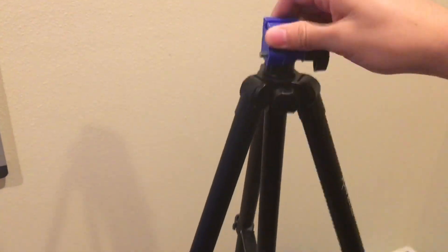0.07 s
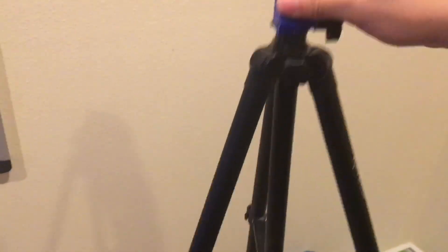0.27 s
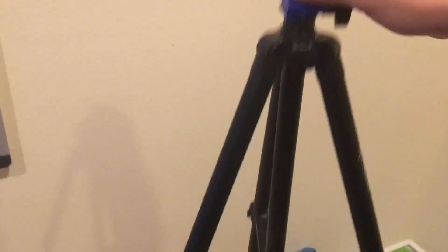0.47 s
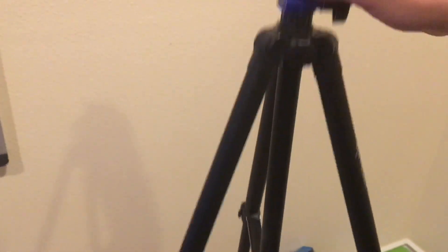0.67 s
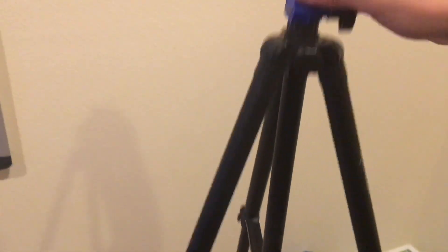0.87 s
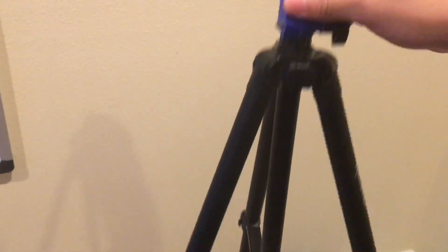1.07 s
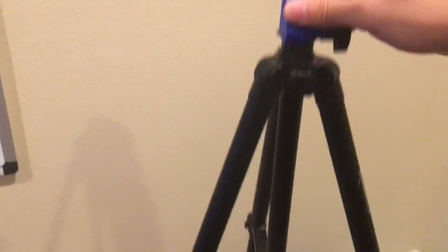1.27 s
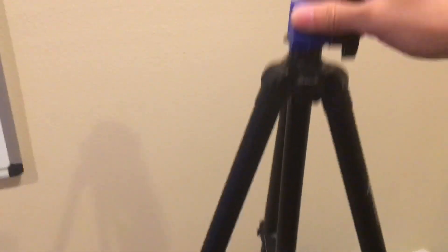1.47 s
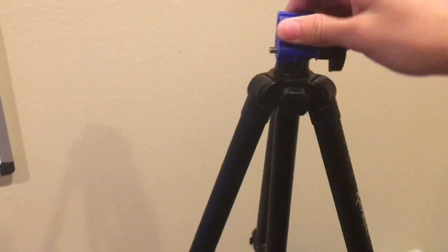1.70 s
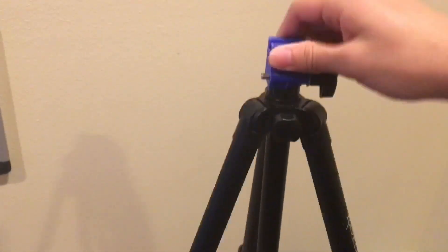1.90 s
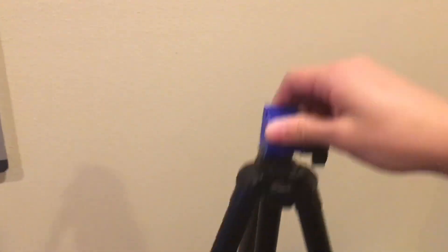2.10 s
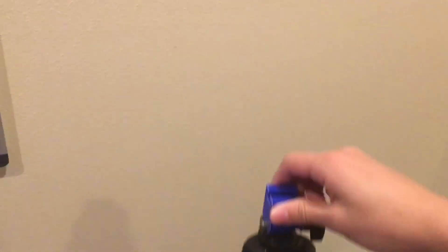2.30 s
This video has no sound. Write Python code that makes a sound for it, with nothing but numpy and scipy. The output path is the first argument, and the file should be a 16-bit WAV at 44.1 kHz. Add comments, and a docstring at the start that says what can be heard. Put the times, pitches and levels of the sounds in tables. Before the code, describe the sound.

Sharp ratchety clacks as a small plastic mount is screwed onto a tripod.

```python
"""Screwing a mount onto a tripod

A small plastic mount is screwed onto a tripod head in quick finger turns, about five a second.
At each turn the loose part ticks, scrapes along the thread by stick-slip friction and clacks against
its seat, often in two or three impacts that excite damped modes of the plastic and the steel screw.
The thread knocks softly between turns. A small room reverberates, and an appliance hums in it."""
import sys
import numpy as np
from scipy import signal
from scipy.fft import rfft, irfft, next_fast_len
from scipy.io import wavfile
from scipy.ndimage import map_coordinates

SR = 44100
rng = np.random.default_rng(int(sys.argv[2]) if len(sys.argv) > 2 else 0)


def digitize_waveform(pressure):
    """Quantize a signal to 16-bit integers and store it at the path in sys.argv[1].

    Rows of a 2-D input are taken as channels; values are limited to [-1, 1].
    """
    field = np.atleast_2d(pressure).T
    bounded = np.clip(field, -1, 1)
    quanta = np.round(bounded * 32767).astype(np.int16)
    wavfile.write(sys.argv[1], SR, quanta)


N = 108045


def amp(db):
    """Amplitude ratio of a level in decibels."""
    return 10 ** (np.asarray(db) / 20)


def unit_rms(x):
    """Normalisation to an rms of 1."""
    return x / np.sqrt(np.mean(x ** 2) + 1e-20)


def curve_at(points, hz):
    """Interpolation of (frequency [Hz], value) points on a logarithmic frequency axis."""
    freqs, values = np.transpose(points)
    return np.interp(np.log(hz + 1), np.log(freqs + 1), values)


def decay(t, t60):
    """Exponential damping: 60 dB in t60 seconds."""
    return np.exp(-np.log(1000) * t / t60)


def filtered(x, gain_db):
    """Minimum-phase filtering by the folded cepstrum; gain_db is a function of frequency."""
    size = 2 * next_fast_len(len(x))
    cepstrum = irfft(np.log(amp(gain_db(np.fft.rfftfreq(size, 1 / SR)))), size)
    cepstrum[1:size // 2] *= 2
    cepstrum[size // 2 + 1:] = 0
    return irfft(rfft(x, size) * np.exp(rfft(cepstrum)), size)[:len(x)]


def wobble(rate_hz):
    """Smooth random modulation: a spline through rate_hz Gaussian values a second."""
    knots = rng.standard_normal(int(N * rate_hz / SR) + 4)
    return map_coordinates(knots, [np.arange(N) * rate_hz / SR])


def add(track, start_s, x):
    """Superposition of x onto the track from start_s on."""
    part = track[..., round(start_s * SR):][..., :x.shape[-1]]
    part += x[..., :part.shape[-1]]


# Partials of the appliance hum: (frequency [Hz], rms level [dB])
HUM_PARTIALS = [(59.8, -53), (119.9, -36.5), (221, -60), (240, -58.5), (259.3, -47), (379.3, -62.5)]
def appliance_hum():
    """A line spectrum with slight random amplitude and phase modulation."""
    t = np.arange(N) / SR
    hum = np.zeros(N)
    for hz, db in HUM_PARTIALS:
        peak = np.sqrt(2) * amp(db + 0.32 * wobble(4.87))
        hum += peak * np.sin(2 * np.pi * (hz * t + rng.random()) + .06 * wobble(3))
    return hum


# Spectrum of the still room air: (frequency [Hz], relative level [dB])
AIR_SPECTRUM = [(20, -15), (40, 4.5), (62, 3.5), (90, 3.5), (138, 9), (175, -4.5), (300, -7.5), (420, -9.5),
                (700, -17), (1500, -16.5), (3000, -20.5), (6000, -35.5), (15000, -38.5)]
def room_air(level_db=-44.5):
    """Stationary broadband noise, strongest in the bass."""
    gain = amp(curve_at(AIR_SPECTRUM, np.fft.rfftfreq(N, 1 / SR)))
    return amp(level_db) * unit_rms(irfft(rfft(rng.standard_normal(N)) * gain, N))


# Spectrum of the friction noise: (frequency [Hz], relative level [dB])
RASP_SPECTRUM = [(150, -25), (400, -17), (700, -8), (1200, 1.5), (1900, 2), (3200, 3), (4200, -1),
                 (5000, -2), (6800, -1), (9000, -8), (12000, -14), (16000, -19)]
# Narrow resonances of the thread: (frequency [Hz], relative level [dB])
SQUEAK_RESONANCES = [(2950, -2), (6380, 0), (8300, -14)]
# Scrapes along the thread: (time [s], duration [s], level [dB], squeak re rasp [dB])
SCRAPES = [(0.069, 0.038, -54, 0), (0.117, 0.042, -41.5, 1), (0.285, 0.067, -43.5, -16),
           (0.356, 0.011, -35.5, -9), (0.51, 0.037, -33.5, -19), (0.561, 0.014, -32.5, -17.5),
           (0.72, 0.058, -39.5, -18), (0.924, 0.045, -38, -2), (0.977, 0.021, -29, -19),
           (1.136, 0.024, -40, -2), (1.31, 0.052, -39.5, 1.5), (1.507, 0.044, -35, -1.5),
           (1.735, 0.027, -39.5, -5.5), (1.91, 0.04, -36.5, -6), (2.134, 0.053, -31.5, 3)]
def thread_scrapes(slips_per_s=2300, squeak_width_hz=240):
    """Stick-slip friction: dense random slips merge into a rasp, and narrow resonances squeak."""
    t = np.arange(N) / SR
    slips = (rng.random(N) < slips_per_s / SR) * rng.standard_normal(N)
    grain = rng.standard_normal(SR // 50) * decay(t[:SR // 50], t60=0.027)
    friction = signal.fftconvolve(slips, grain)[:N]
    rasp = unit_rms(filtered(friction, lambda f: curve_at(RASP_SPECTRUM, f)))
    squeak, out = np.zeros((2, N))
    for hz, db in SQUEAK_RESONANCES:
        envelope = wobble(squeak_width_hz) + 1j * wobble(squeak_width_hz)
        squeak += amp(db) * np.real(envelope * np.exp(2j * np.pi * hz * t))
    squeak = unit_rms(squeak)
    for start_s, duration_s, db, squeak_db in SCRAPES:
        scrape = (rasp + amp(squeak_db) * squeak)[round(start_s * SR):][:round(duration_s * SR)]
        add(out, start_s, amp(db) * unit_rms(scrape) * signal.windows.tukey(len(scrape), .5))
    return out


def ringing(modes, t, scatter_db=2.5, scatter_hz=18):
    """Free vibration: a sum of damped modes, their strength and pitch varying from strike to strike."""
    hz, db, t60 = np.transpose(modes)[:, :, None]
    strength, detune, phase = rng.standard_normal((3, len(modes), 1))
    envelopes = amp(db + scatter_db * strength) * decay(t, t60)
    sines = np.sin(2 * np.pi * ((hz + scatter_hz * detune) * t + phase))
    return unit_rms(np.sum(envelopes * sines, axis=0))


# Modes of the plastic mount and tripod head: (frequency [Hz], relative level [dB], T60 [s])
MOUNT_MODES = [(1100, -8, .03), (1715, -2, .036), (2235, -7, .035), (2540, -3, .035), (2800, -3, .045),
               (3135, -3, .04), (3560, -4, .04), (3930, -3, .03), (4085, -1, .04), (5400, -6, .025),
               (6720, -4, .04)]
# Modes of the steel screw: (frequency [Hz], relative level [dB], T60 [s])
STEEL_MODES = [(10080, -3, .035), (11680, -9, .025), (12020, -7, .025), (12770, 0, .03)]
def impact(spectrum, ring_db, attack_s, t60_s, treble_db, bass_db, favoured_hz=None, screw_db=None):
    """Impact excitation: a noisy crack plus modes, as direct sound and as sound spread into the room."""
    t = np.arange(SR // 8) / SR
    snap = amp(-4.5) * decay(t, t60=0.0031)
    body = amp(-16) * decay(t, t60=0.15)
    burst = rng.standard_normal(len(t)) * (snap + decay(t, t60_s) + body)
    crack = unit_rms(filtered(burst, lambda f: curve_at(spectrum, f)))
    ring = amp(ring_db) * ringing(MOUNT_MODES, t)
    onset = 1 - np.exp(-t / attack_s)
    treble_shelf = [(4000, 0.0068), (7500, treble_db)]
    bass_shelf = [(1300, bass_db), (2600, 0.013)]
    shelves = lambda f: curve_at(treble_shelf, f) + curve_at(bass_shelf, f)
    room_share = amp(-10)  # part of the ringing that reaches the room
    direct = unit_rms(filtered((crack + ring) * onset, shelves))
    spread = unit_rms(filtered((crack + room_share * ring) * onset, shelves))
    if favoured_hz is not None:  # a full clack favours one resonance and rings the screw
        peak_db, half_width_hz = 7, 130
        resonance = lambda f: peak_db / (1 + ((f - favoured_hz) / half_width_hz) ** 2)
        screw = amp(screw_db) * ringing(STEEL_MODES, t)
        direct = unit_rms(filtered(direct, resonance)) + screw
        spread = spread + room_share * screw
    return np.array([unit_rms(direct), unit_rms(spread)])


def impacts(rows, spectrum, ring_db, gain_db, attack_s, t60_s):
    """Linear superposition of a table of impacts, as (direct, spread) tracks."""
    out = np.zeros((2, N))
    for start_s, db, *timbre in rows:
        add(out, start_s, amp(db + gain_db) * impact(spectrum, ring_db, attack_s, t60_s, *timbre))
    return out


# Dense, quickly damped vibration in knocks and clacks: (frequency [Hz], relative level [dB])
IMPACT_SPECTRUM = [(120, -19.5), (370, -11), (520, -11), (680, -13.5), (850, -9), (1100, -8.5),
                   (1800, -0.5), (3000, -3.5), (4150, -0.5), (4700, -9.5), (5500, -4), (7000, -5.5),
                   (7800, -10), (9000, -6.5), (10400, -14), (11600, -6), (12400, -18), (13500, -10),
                   (16000, -23.5)]
# Knocks of the thread between turns: (time [s], relative level [dB], treble [dB], bass [dB])
THREAD_KNOCKS = [(.081, -34.5, -17, 13), (.287, -28.5, -1, -4), (.322, -35, -3, 21), (.668, -30.5, -5, 13),
                 (.877, -28.5, -34, 7), (.881, -34, -21, 9), (1.044, -33, -23, 2), (1.077, -27, -0.5, 8.5),
                 (1.1225, -28, -15, 7), (1.140, -28, 0, 11), (1.3115, -27, -20, 5), (1.468, -26, -4, 6.5),
                 (1.646, -29, -11, -1), (1.677, -22.5, -7, 9), (1.848, -27.5, -10, 2), (1.871, -36, -8, 14),
                 (1.914, -35, -21, 0), (2.044, -27, -6, 0), (2.076, -24.5, -3, -5), (2.081, -26.5, -18, 10),
                 (2.097, -30.5, 5, 3)]
def thread_knocks():
    """Soft impacts build up in about a millisecond and hardly excite the modes."""
    return impacts(THREAD_KNOCKS, IMPACT_SPECTRUM,
                   ring_db=-20.5, gain_db=-21.5, attack_s=0.00099, t60_s=0.017)


# Spectrum of a light contact: (frequency [Hz], relative level [dB])
TICK_SPECTRUM = [(150, -36.5), (700, -18), (1800, -2), (2600, 1), (3000, -3), (4100, -5.5), (4750, -6),
                 (6600, 4), (7600, 3.5), (8300, -4.5), (10000, 1), (12700, 2.5), (13600, -3.5),
                 (16000, -2.5)]
# Ticks of the loose mount: (time [s], relative level [dB], treble [dB], bass [dB])
MOUNT_TICKS = [(.1283, -30.5, -7, 5), (.1314, -26.5, 5, 5), (.289, -32, -3, 6), (.2935, -26.5, 4, 6),
               (.3612, -27, 1, 14), (.3635, -23, -6, -13), (.367, -29, -22, 13), (.5122, -24.5, 6, -17),
               (.521, -30, 0, 0), (.7263, -21.5, 7, -22), (.7278, -22.5, -5.5, -2), (.734, -25, -5.5, 1.5),
               (.763, -50, -6, -27), (.9302, -35, -11, 4), (.9346, -21, 43, 18), (1.1303, -32.5, 12, 2),
               (1.134, -30.5, 19, 22), (1.3195, -27, 8, -5), (1.3235, -23.5, 18, -4),
               (1.3425, -44.5, 0, -0.5), (1.521, -29, -2, -1), (1.5243, -20.5, 7, -5),
               (1.532, -27.5, -14, -4), (1.5615, -32, -8.5, 12), (1.7265, -37, 1.5, 4),
               (1.7305, -25, -9, -1.5), (1.736, -26.5, -6, 2), (1.9213, -31, 13, 3), (1.9244, -23.5, 4, 10),
               (1.931, -24.5, -13, 5), (2.133, -33.5, 1, 5), (2.1395, -31, 15, 0)]
def mount_ticks():
    """Light, brief impacts give bright broadband transients as the fingers take up the play."""
    return impacts(MOUNT_TICKS, TICK_SPECTRUM, ring_db=-20.5, gain_db=-15, attack_s=.0001, t60_s=0.027)


# Impacts on the seat: (time [s], relative level [dB], treble [dB], bass [dB],
# favoured resonance [Hz], screw ring re rest of the clack [dB])
SEAT_CLACKS = [(.1461, -12.5, 3, -5, 1610, -32), (.1483, -8.5, -0.5, 0.5, 3250, -31),
               (.3773, -9, 3, -4, 2690, -9.5), (.3791, -9, 1.5, 3.5, 2500, -15),
               (.3832, -11.5, 13.5, 11, 2430, -25), (.5782, -18.5, 10, 5.5, 6530, -9),
               (.5821, -4.5, 2, 1, 2800, -39), (.5868, -37, 8, -14, 1720, -27),
               (.7760, -18.5, -3, 1, 3000, -18), (.7777, -9.5, 5, 1.5, 3050, -22),
               (.7846, -15, 10, -36, 6450, -10), (.9645, -21.5, -11, -5.5, 3360, -33),
               (.9862, -21, 9, 11.5, 3500, -8.5), (1.1585, -19, -5.5, -5, 2620, -28),
               (1.1760, -28, 18, 16, 4000, -12.5), (1.1783, -26, 8, 3, 3860, 10),
               (1.1815, -23, 2, 8.5, 2500, -20.5), (1.3663, -20, -6, -14, 3150, -22),
               (1.3695, -11.5, 6, 4, 4070, -10), (1.3705, -9, 5.5, 4.5, 3900, 0.5),
               (1.3772, -24.5, -7.5, 8, 3260, -11.5), (1.5712, -14.5, -6, -4.5, 2600, -18),
               (1.5748, -14.5, -4, 3.5, 1720, -3), (1.5770, -12.5, 9, -17, 3900, -4.5),
               (1.7645, -33.5, -14, 15, 2600, -16), (1.7682, -16, -1, -2.5, 2700, -21.5),
               (1.7828, -21.5, -0.5, 4.5, 3300, -23.5), (1.9725, -20.5, -21, 10.5, 3300, -19.5),
               (1.9744, -9, 2, -5, 4270, -9.5), (1.9805, -19, 28, -5, 3100, -8.5),
               (2.1663, -17, 0.5, 0, 3960, -22), (2.1870, -22, 10.5, 11, 1680, -13.5)]
def seat_clacks():
    """Modal excitation: the mount hits its seat, and the point of contact favours one resonance."""
    return impacts(SEAT_CLACKS, IMPACT_SPECTRUM, ring_db=-2, gain_db=-17, attack_s=.00012, t60_s=0.013)


# Reverberation time of the room: (frequency [Hz], T60 [s])
REVERB_TIMES = [(300, 0.57), (1500, 0.35), (4000, .48), (8000, 0.36), (15000, 0.42)]
# Colour of the reflected sound: (frequency [Hz], gain [dB])
REVERB_SPECTRUM = [(200, 3.5), (1500, -0.5), (4000, -2.5), (8000, -3.5), (15000, -9.5)]
def reverberation(x, tail_db=-12, walls_db=-16, delay_s=.006):
    """Convolution with early wall reflections and a diffuse tail, drawn anew for every 0.2 s of sound."""
    out, step = np.zeros(N), SR // 5
    for start in range(0, N, step):
        hz, frame_s, noise = signal.stft(rng.standard_normal(SR // 2), SR, nperseg=256)
        damping = decay(frame_s, curve_at(REVERB_TIMES, hz)[:, None])
        tail = signal.istft(noise * damping, SR, nperseg=256)[1]
        t = np.arange(len(tail)) / SR
        arrivals = rng.random(len(t)) < 900 / SR  # 900 reflections a second
        walls = arrivals * rng.standard_normal(len(t)) * decay(t, t60=0.13)
        response = amp(tail_db) * tail / np.linalg.norm(tail)
        response += amp(walls_db) * walls / np.linalg.norm(walls)
        add(out, start / SR + delay_s, signal.fftconvolve(x[start:start + step], response))
    return filtered(out, lambda f: curve_at(REVERB_SPECTRUM, f))


def scene():
    """Direct sound, reverberant field and steady background superpose in one channel."""
    direct, spread = seat_clacks() + mount_ticks() + thread_knocks() + thread_scrapes()
    return (direct + reverberation(spread) + appliance_hum() + room_air())[None]


def record(dry):
    """Soft saturation rounds the loudest peaks at full scale; an ideal low-pass limits the band."""
    rounded = dry / (1 + np.abs(dry) ** 6) ** (1 / 6)
    passband = np.fft.rfftfreq(N, 1 / SR) < 15850
    return irfft(rfft(rounded) * passband, N)


dry = scene()
out = record(dry)
digitize_waveform(out)
```